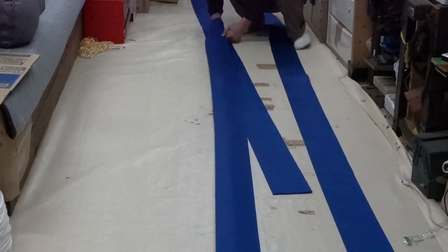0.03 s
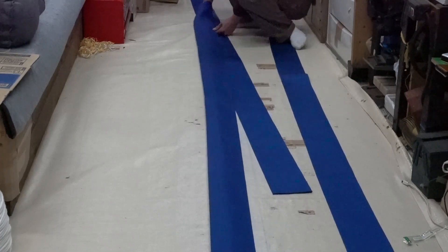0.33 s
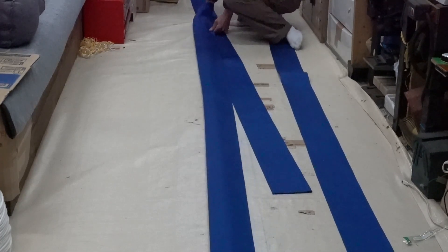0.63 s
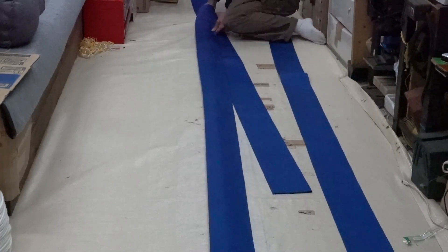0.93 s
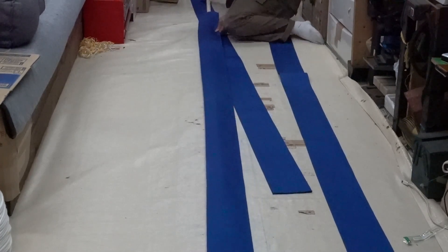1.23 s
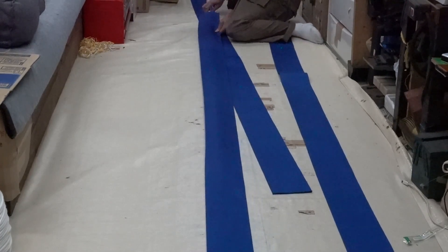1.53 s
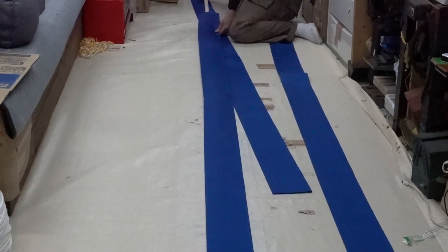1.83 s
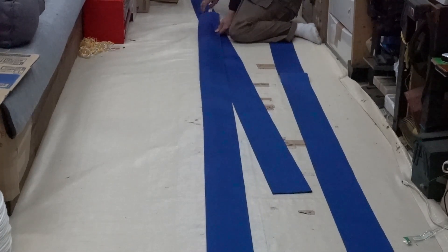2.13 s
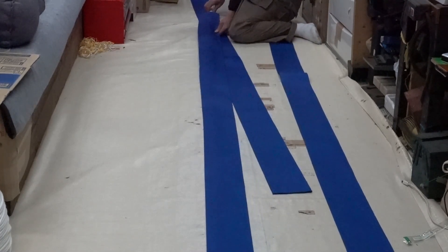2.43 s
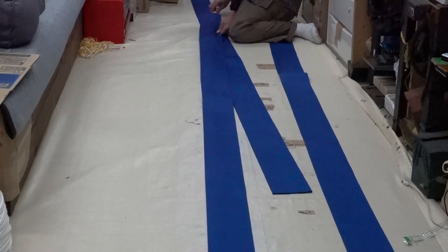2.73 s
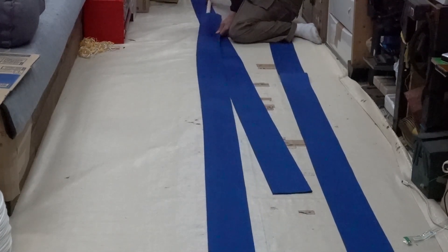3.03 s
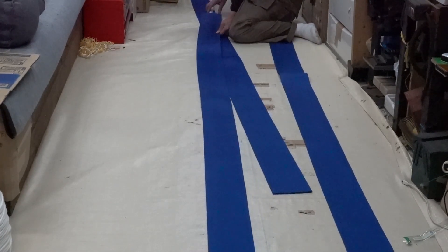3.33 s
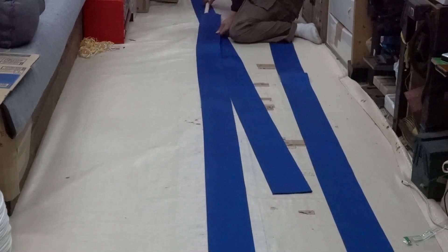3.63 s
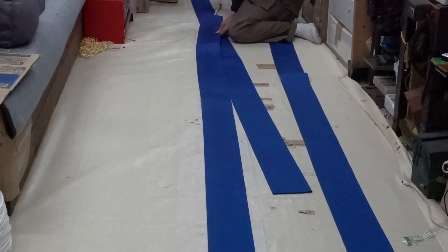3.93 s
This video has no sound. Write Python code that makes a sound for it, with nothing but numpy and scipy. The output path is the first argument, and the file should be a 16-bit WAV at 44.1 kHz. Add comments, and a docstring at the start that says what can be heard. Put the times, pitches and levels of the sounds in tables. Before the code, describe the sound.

A hand rubs flat woven hose on a floor: two zipping, squeaky sweeps, then three harder strokes that buzz and rasp. Clothes rustle between moves and a soft knock lands, over a faint hum in a small workshop.

```python
"""Someone kneels on a covered workshop floor and rubs flat woven hose, over a faint mains hum.
First come two sweeps of the hand: the fine weave zips and squeaks, with a rustle of clothes in between.
At 1.7 s a harder stroke follows: the ribs buzz at a rate set by the hand's speed and ring the floor.
Clothes rustle again, a soft knock lands at 2.6 s, and two more hard strokes close the scene.
The fibres rasp and hiss through all five moves, and the small cluttered room adds a short echo."""
import sys
import numpy as np
from scipy import signal
from scipy.fft import rfft, irfft
from scipy.io import wavfile
from scipy.ndimage import uniform_filter1d

SR = 44100
rng = np.random.default_rng(int(sys.argv[2]) if len(sys.argv) > 2 else 0)


def output_pcm(signal):
    """Save a mono or channel-first signal as 16-bit PCM at the path in sys.argv[1].

    Samples are clipped to [-1, 1] before scaling.
    """
    pcm = np.clip(np.atleast_2d(signal).T, -1, 1) * 32767
    wavfile.write(sys.argv[1], SR, np.round(pcm).astype(np.int16))


N = 176400
TIME = np.arange(N) / SR

# Tone of the room's air and rumble. Each row: frequency in Hz, relative level in dB.
AIR_COLOUR = [(150,-8.5),(1200,-21.5),(4500,-30.5),(5400,-23),(8000,-30.5),(16000,-31.5)]
RUMBLE_COLOUR = [(15,-8),(45,3),(65,-3),(90,-10),(140,-17),(400,-56)]
# The rumble's slow fade. Each row: time in seconds, level in dB.
RUMBLE_FADE = [(0,-47.5),(4,-59)]
# Mains hum. Each row: frequency in Hz, level in dB.
MAINS_HUM = [(120,-57)]
# Stereo width of diffuse sound. Each row: frequency in Hz, gain of the side signal in dB.
STEREO_WIDTH = [(60,-39),(250,-24),(500,-14.5),(2000,-7.5),(15000,-4)]
# The action's lean to the left. Each row: frequency in Hz, left minus right in dB.
BALANCE = [(500,0.5),(1200,2),(4000,1),(15000,0.5)]

# Movement of the clothes. Each row: time in seconds, level in dB.
RUSTLE_LEVEL = [(.45,-49.5),(.6,-60),(.69,-50.5),(.76,-57.5),(.83,-48.5),(.92,-42.5),(.98,-50.5),(1.06,-48),(2.3,-71),(2.56,-63.5),(2.62,-48.5),(2.7,-53),(2.85,-59.5)]
# The knock with its settling, and the hand's snags. Each row: onset in seconds, level in dB.
KNOCKS = [(2.643,-29.5),(2.655,-31)]
SNAGS = [(1.203,-21),(3.007,-19.5),(3.227,-25),(3.697,-20)]
# Tone of clothes, knock, snags and fibres. Each row: frequency in Hz, relative level in dB.
RUSTLE_COLOUR = [(200,-17),(800,-4.5),(1500,-2),(2400,-0.5),(4000,-3),(7000,-9.5),(15000,-15.5)]
KNOCK_COLOUR = [(60,-40),(170,-8),(280,3),(400,-20),(780,-4.5),(1250,-12),(1750,-6.5),(2200,-14.5),(3700,-18),(15000,-44.5)]
SNAG_COLOUR = [(120,-49),(260,13),(900,17),(2000,0),(4200,-6),(7000,-18),(15000,-37)]
RASP_COLOUR = [(500,-30),(1400,-6),(2100,-7.5),(3000,-4.5),(4400,-4.5),(5800,-10),(8000,-18),(15000,-37)]
HISS_COLOUR = [(1500,2),(4000,-4.5),(6000,-4),(8000,-3),(10500,-4.5),(13000,-7.5),(16000,-10.5)]
# Fibre envelopes, one list a move. Each row: time in seconds, relative rasp and hiss levels in dB.
FIBRE_LEVELS = [
    [(0,-38,-46),(.1,-37.5,-39.5),(.25,-40.5,-47.5),(.34,-42.5,-43),(.48,-56,-57),(.6,-77,-65)],
    [(.96,-50.5,-55.5),(1.13,-46,-39.5),(1.195,-46,-34.5),(1.238,-51,-43.5),(1.25,-40,-36.5),(1.295,-39.5,-38.5),(1.34,-44,-42.5),(1.47,-44.5,-45),(1.63,-58.5,-57.5)],
    [(1.65,-54,-55.5),(1.74,-46,-47),(1.81,-35,-41.5),(1.91,-37.5,-44),(1.96,-35.5,-42),(2.0,-42,-44.5),(2.14,-45,-44),(2.27,-53,-50.5),(2.38,-66,-68)],
    [(2.86,-56.5,-64),(2.94,-49.5,-48.5),(3.02,-43,-44.5),(3.08,-43.5,-43.5),(3.22,-48,-44),(3.41,-52,-49.5),(3.49,-85,-63)],
    [(3.51,-62,-62),(3.6,-49,-47.5),(3.715,-43,-43.5),(3.9,-48,-46),(3.95,-44.5,-44.5),(4.0,-50,-48.5)],
]
# Skids of the hand. Each row: peak time and half length in seconds, centre and width in Hz, level in dB.
SKIDS = [(.165,.044,1130,680,-23),(1.265,.02,3200,3500,-35)]
# Squeaks. Each row: peak time and half length in seconds, multiple of the thread rate, level in dB.
SQUEAKS = [(.055,.06,1,-31),(.085,.032,2,-27.5),(.245,.03,1,-31),(.31,.035,1,-36),(1.118,.03,1,-32),(1.255,.03,1,-33)]

# Effort of the hand, one list a sweep or stroke. Each row: time in seconds, relative level in dB.
SWEEP_EFFORT = [
    [(0,-36.5),(.04,-25.5),(.11,-31),(.245,-32),(.34,-35),(.46,-49.5),(.6,-77)],
    [(.96,-51.5),(1.0,-44),(1.08,-38.5),(1.108,-35.5),(1.128,-23.5),(1.175,-29),(1.207,-23),(1.234,-35),(1.26,-28),(1.34,-37),(1.4,-33),(1.5,-43),(1.64,-64)],
]
STROKE_EFFORT = [
    [(1.65,-65),(1.735,-38),(1.79,-24),(1.87,-19.5),(1.91,-22.5),(1.965,-23),(2.008,-34),(2.025,-23.5),(2.06,-27.5),(2.12,-25),(2.2,-40),(2.36,-69.5)],
    [(2.89,-61),(2.94,-32),(2.975,-26),(3.001,-30),(3.012,-20),(3.08,-26.5),(3.115,-20.5),(3.15,-24.5),(3.175,-32.5),(3.221,-36.5),(3.231,-21),(3.27,-31.5),(3.33,-31),(3.41,-38.5),(3.48,-57)],
    [(3.51,-59),(3.56,-39),(3.645,-22.5),(3.68,-29),(3.708,-21),(3.755,-29),(3.812,-22.5),(3.875,-30.5),(3.918,-39.5),(3.948,-25),(4.0,-37)],
]
# Hand speed over the weave. Each row: time in seconds, threads or ribs crossed per second.
THREAD_RATE = [(0,640),(.05,718),(.1,750),(.165,760),(.228,690),(.285,545),(.35,425),(.6,200),(1.03,690),(1.085,855),(1.135,1020),(1.21,930),(1.3,830),(1.6,620)]
RIB_RATE = [(1.0,144),(1.12,180),(1.21,320),(1.26,390),(1.33,290),(1.4,370),(1.6,150),
            (1.755,200),(1.785,296),(1.83,322),(1.86,368),(1.9,378),(1.96,428),(1.99,335),(2.07,242),(2.15,236),(2.19,178),
            (2.93,165),(2.995,198),(3.012,312),(3.035,278),(3.065,282),(3.105,358),(3.135,358),(3.19,179),(3.23,366),(3.245,360),(3.265,184),
            (3.595,165),(3.63,207),(3.68,212),(3.703,314),(3.745,274),(3.79,360),(3.825,282),(3.87,188),(4.0,177)]
# How much the sweeps catch the ribs. Each row: time in seconds, buzz level against the zip in dB.
RIB_CATCH = [(0,-8.5),(.2,-19.5),(1.1,1),(1.2,5)]
# Tone of the zip, the light buzz and the pressed buzz. Each row: frequency in Hz, relative level in dB.
ZIP_COLOUR = [(100,-57),(300,-7.5),(480,-1.5),(720,0.5),(1100,2),(1500,-10.5),(1850,-8),(3000,-16),(6000,-29.5)]
LIGHT_BUZZ_COLOUR = [(70,-42),(130,-15),(200,-2.5),(400,-1),(700,-1.5),(1100,-6.5),(2000,-34)]
PRESSED_BUZZ_COLOUR = [(60,-45),(130,-43),(200,1.5),(400,-2.5),(900,9.5),(1350,-7.5),(2000,-34),(3000,-45)]
# EQ of the pressed slips, and the bass cut at speed. Each row: frequency in Hz, gain in dB.
SLIP_COLOUR = [(40, -40), (100, -15), (170, 11.5), (2000, -1.5), (5000, -40.5)]
FAST_COLOUR = [(200, -8), (300, -5.0), (600, 2.0)]
# Resonances of hose and floor. Each row: frequency in Hz, bandwidth in Hz, relative level in dB.
FLOOR_MODES = [(178,22,0),(318,48,2.5),(435,45,0),(630,14,-6),(724,22,5),(748,22,2),(840,22,6),(980,38,3),(1200,32,-4),(1275,36,-2),(1475,32,-5),(1720,37,-10),(2020,30,-10)]

ROOM_T60_S, SWEEP_WET_DB, NEAR_WET_DB, NEAR_SIDE_DB = 0.44, -6, -8, 4.5
SPEED_WOBBLE = .018  # share of the hand's speed
FAST_HZ, FAST_SPAN_HZ = 222, 70.5  # rib rates over which the deepest ring drops away


def undb(db):
    """Decibels to gain."""
    return 10 ** (np.asarray(db) / 20)


def unit(x):
    """Scale to an rms of 1."""
    return x / np.sqrt(np.mean(x ** 2))


def curve(rows, column=1):
    """One column of a table, joined by straight lines in time."""
    rows = np.array(rows)
    return np.interp(TIME, rows[:, 0], rows[:, column])


def envelope(moves, column=1):
    """Gain of a series of hand moves, silent between them."""
    return sum(undb(curve(rows, column)) * (TIME >= rows[0][0] - .02) * (TIME <= rows[-1][0])
               for rows in moves)


def swell(at, half_length):
    """A smooth rise and fall around one moment."""
    return np.exp(-((TIME - at) / half_length) ** 2)


def colour(x, points):
    """EQ through a set of (Hz, dB) points."""
    hz, db = np.array(points).T
    bins_hz = np.maximum(np.arange(N // 2 + 1) * SR / N, 1)
    return irfft(rfft(x) * undb(np.interp(np.log(bins_hz), np.log(hz), db)), N)


def noise(points):
    """Coloured noise of rms 1."""
    return unit(colour(rng.standard_normal(N), points))


def drift(rate_hz):
    """Random modulation of rms 1, gliding to a new value rate_hz times a second."""
    hold = int(SR / rate_hz)
    steps = np.repeat(rng.standard_normal(N // 50), hold)[:N]
    return unit(uniform_filter1d(steps, hold))


def steady(x):
    """Ride a sound to constant strength, ready to take an envelope."""
    power = np.atleast_2d(x ** 2).mean(0)
    smoothed = uniform_filter1d(uniform_filter1d(power, size=1100), size=1100)
    return x / np.sqrt(np.maximum(smoothed, 1e-12))


def spread(mid, side):
    """Diffuse stereo: narrow in the bass, wide in the treble."""
    return mid + colour(side, STEREO_WIDTH) * np.array([[1], [-1]])


def room(x, wet_db, side_db=0):
    """Blend the direct sound with the workshop's short echo."""
    fade = undb(-60 * TIME / ROOM_T60_S) * (TIME > .003)  # 3 ms pre-delay
    mid, side = rng.standard_normal((2, N))
    tail = spread(mid, undb(side_db) * side) * fade / np.sqrt(np.sum(fade ** 2))
    wet = signal.fftconvolve(x[None], tail[:, :SR // 2], axes=1)[:, :N]
    return (x + undb(wet_db) * wet) / np.hypot(1, undb(wet_db))


def room_tone(whine_hz=14940):
    """The bed: still air, mains hum, a thin electrical whine and a low rumble."""
    air = spread(noise(AIR_COLOUR), undb(7.5) * noise(AIR_COLOUR)) * undb(-58)
    hum = sum(np.sqrt(2) * undb(db) * np.sin(2 * np.pi * hz * TIME + 0.61 * drift(19))
              for hz, db in MAINS_HUM)
    whine = undb(-72 + 2 * drift(90)) * np.sqrt(2) * np.sin(2 * np.pi * whine_hz * TIME)
    rumble = noise(RUMBLE_COLOUR) * undb(curve(RUMBLE_FADE))
    return air + hum + whine + rumble


def clothes():
    """Trousers rustle as the weight shifts."""
    cloth = spread(noise(RUSTLE_COLOUR), undb(-1.5) * noise(RUSTLE_COLOUR))
    return cloth * undb(curve(RUSTLE_LEVEL) + 1.2 * drift(50.52))


def bumps(hits, tone, attack_s, decay_s, wet_db):
    """Dull contacts: bursts of dark noise that die away quickly."""
    force = 0
    for at, db in hits:
        attack = np.clip((TIME - at) / attack_s + .5, 0, 1)
        decay = np.exp(-np.maximum(TIME - at, 0) / decay_s)
        force += undb(db) * attack * decay
    return room(steady(noise(tone)) * force, wet_db)


def grit(rate_hz, scatter_db):
    """Tiny clicks of fibres that catch and let go at random."""
    catches = rng.random(N) < rate_hz / SR
    return unit(catches * rng.standard_normal(N) * undb(scatter_db * rng.standard_normal(N)))


def fibres():
    """The grainy rasp and fine hiss of the weave in every sweep and stroke."""
    coarse = unit(colour(grit(4000, 0.32), RASP_COLOUR))
    rasp = unit(spread(coarse, undb(-1) * noise(RASP_COLOUR)))
    fine = unit(colour(grit(14000, 0.43), HISS_COLOUR))
    hiss = unit(spread(fine, undb(2) * noise(HISS_COLOUR)))
    rasp_gain = undb(-0.5 + 0.84 * drift(60)) * envelope(FIBRE_LEVELS, column=1)
    hiss_gain = undb(3 + .5 * drift(44)) * envelope(FIBRE_LEVELS, column=2)
    return rasp * rasp_gain + hiss * hiss_gain


def skids():
    """The hand slips faster for a moment and the swish brightens."""
    swishes = 0
    for at, half_length, hz, width, db in SKIDS:
        band = signal.iirpeak(hz, hz / width, SR)
        swish = signal.lfilter(*band, signal.lfilter(*band, grit(2500, 2.6)))
        swishes += unit(swish) * undb(db) * swell(at, half_length)
    return room(swishes, SWEEP_WET_DB)


def crossings(rate_rows, wobble_hz):
    """Running count of the threads or ribs passed by a slightly unsteady hand."""
    return np.cumsum(curve(rate_rows) * (1 + SPEED_WOBBLE * drift(wobble_hz))) / SR


def squeaks():
    """The threads lock into a nearly pure tone that glides with the speed of the hand."""
    phase = 2 * np.pi * crossings(THREAD_RATE, wobble_hz=150)
    tones = sum(np.sqrt(2) * undb(db) * swell(at, half_length) * np.sin(multiple * phase)
                for at, half_length, multiple, db in SQUEAKS)
    return room(tones * undb(2 * drift(64.2)), NEAR_WET_DB, NEAR_SIDE_DB)


def slips(rate_rows, jitter, scatter_db=2.2):
    """One click per thread or rib crossed, uneven in strength and, by jitter spacings, in place."""
    crossed = crossings(rate_rows, wobble_hz=70)
    shift, accent = rng.standard_normal((N // 40, 2))[:int(crossed[-1])].T
    places = np.arange(len(shift)) + jitter * shift
    at = np.interp(places, crossed, np.arange(N) * (N - 2) / N)
    strength = undb(scatter_db * accent)
    sample = at.astype(int)
    late = at - sample  # each click is shared between two samples
    clicks = np.bincount(sample, strength * (1 - late), N) + np.bincount(sample + 1, strength * late, N)
    return unit(clicks)


def sweeps():
    """The hand skims the fine weave with a gliding zip and now and then catches the ribs."""
    zipping = colour(slips(THREAD_RATE, jitter=.11) + undb(-1) * grit(1500, 3.6), ZIP_COLOUR)
    buzz = colour(slips(RIB_RATE, jitter=.11) + grit(980, 2.1), LIGHT_BUZZ_COLOUR)
    skim = steady(zipping) + undb(curve(RIB_CATCH)) * unit(buzz)
    return steady(room(skim, SWEEP_WET_DB)) * envelope(SWEEP_EFFORT) * undb(-0.12)


def floor_ring(drive):
    """The resonances of the hose pressed on the floor."""
    return sum(undb(db) * signal.lfilter(*signal.iirpeak(hz, hz / width, SR), drive)
               for hz, width, db in FLOOR_MODES)


def strokes():
    """Hard rubbing: each rib's slip rings the floor, clean under a firm push, gritty under a light one."""
    effort = envelope(STROKE_EFFORT)
    looseness = np.minimum(undb(-24) / (effort + 1e-9), 2)
    friction = steady(slips(RIB_RATE, jitter=.04)) + undb(-7) * looseness * grit(1200, 1.1)
    drive = colour(friction, SLIP_COLOUR)
    body = unit(floor_ring(drive)) + undb(-10) * unit(colour(drive, PRESSED_BUZZ_COLOUR))
    # Fast slips leave no time for the deepest ring.
    fast = np.clip((curve(RIB_RATE) - FAST_HZ) / FAST_SPAN_HZ, 0, 1)
    body = (1 - fast) * body + fast * colour(body, FAST_COLOUR)
    return steady(room(body, NEAR_WET_DB, NEAR_SIDE_DB)) * effort * undb(1.17)


def scene():
    """The action sits a little to the left, over the room tone."""
    action = sweeps() + squeaks() + skids() + strokes() + fibres() + clothes()
    action += bumps(SNAGS, SNAG_COLOUR, attack_s=0.0018, decay_s=0.015, wet_db=-2)
    action += bumps(KNOCKS, KNOCK_COLOUR, attack_s=0.007, decay_s=0.02, wet_db=-5)
    left = colour(action[0], [(hz, db / 2) for hz, db in BALANCE])
    right = colour(action[1], [(hz, -db / 2) for hz, db in BALANCE])
    return np.array([left, right]) + room_tone()


def record(dry, cutoff_hz=15800):
    """A steep low-pass takes off the very top."""
    return signal.sosfilt(signal.ellip(10, .1, 90, cutoff_hz, fs=SR, output="sos"), dry)


dry = scene()
out = record(dry)
output_pcm(out)
```